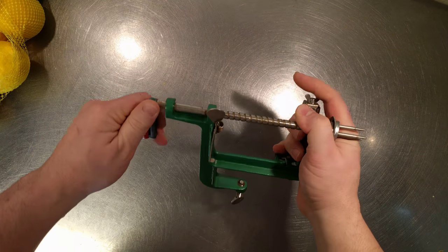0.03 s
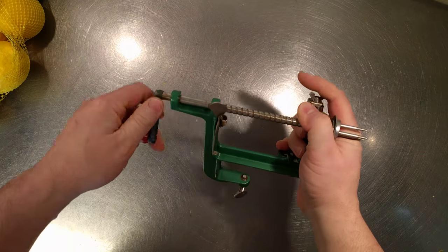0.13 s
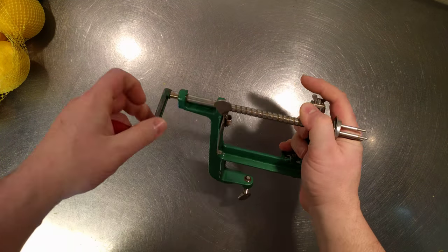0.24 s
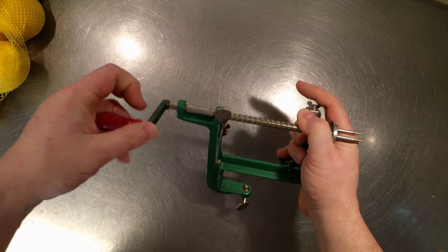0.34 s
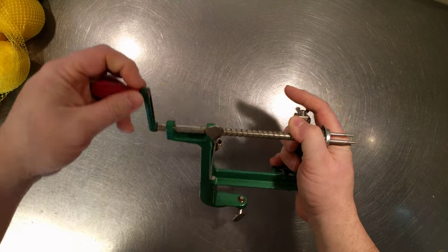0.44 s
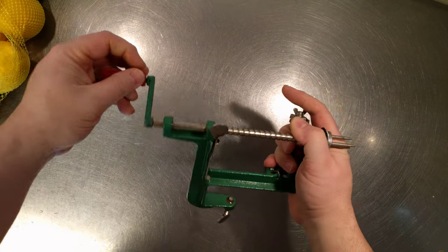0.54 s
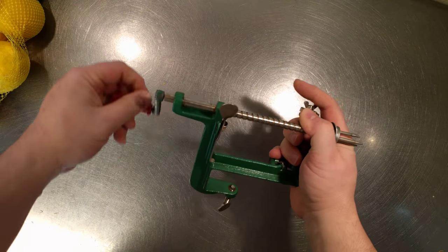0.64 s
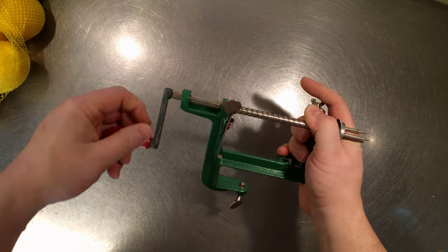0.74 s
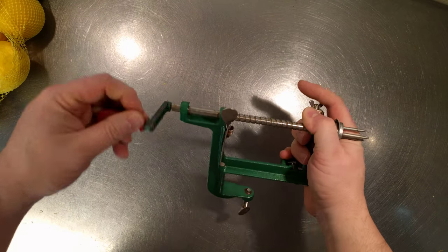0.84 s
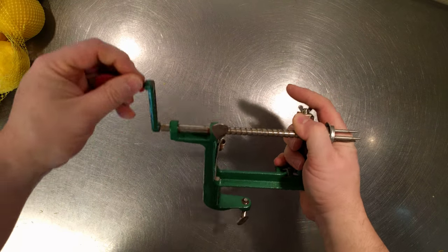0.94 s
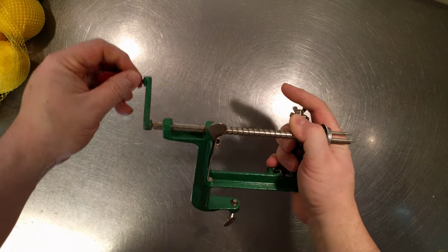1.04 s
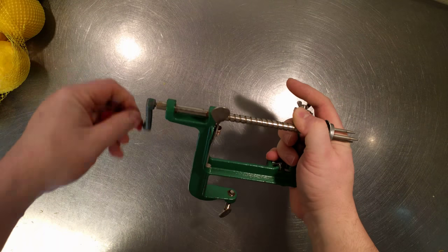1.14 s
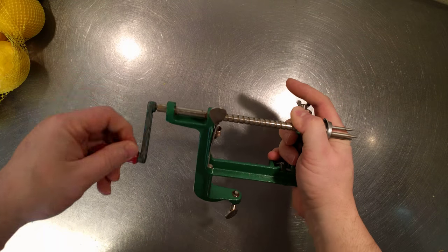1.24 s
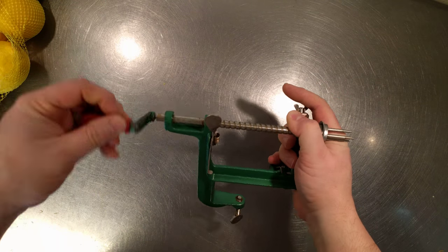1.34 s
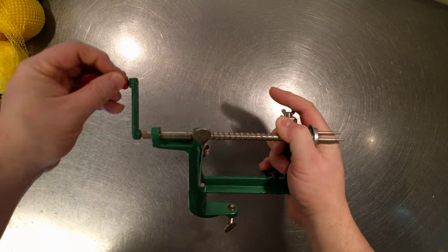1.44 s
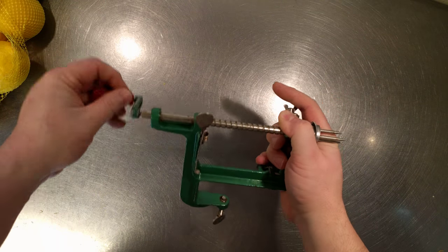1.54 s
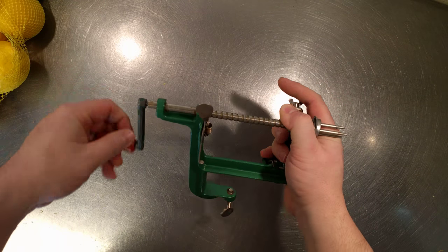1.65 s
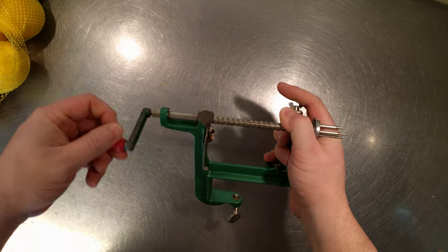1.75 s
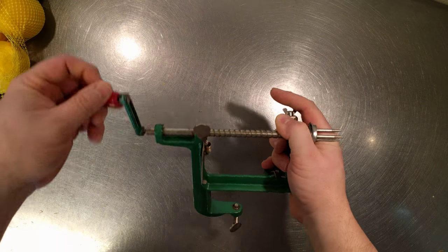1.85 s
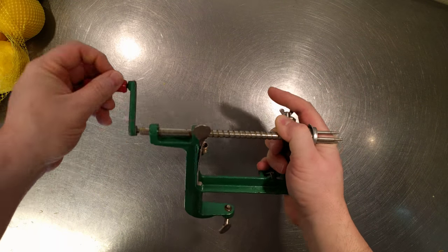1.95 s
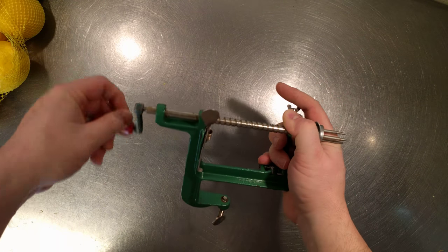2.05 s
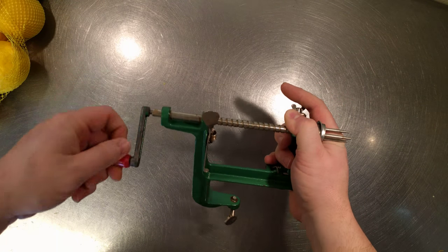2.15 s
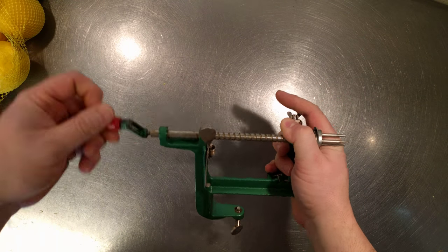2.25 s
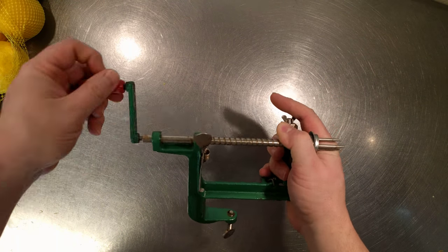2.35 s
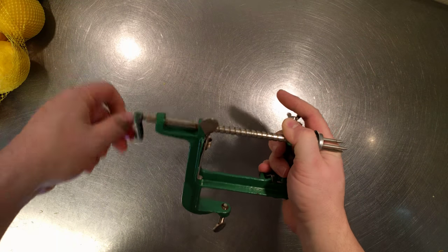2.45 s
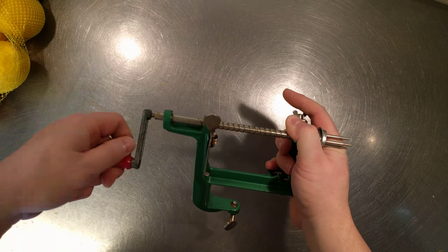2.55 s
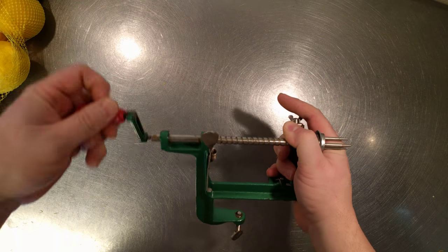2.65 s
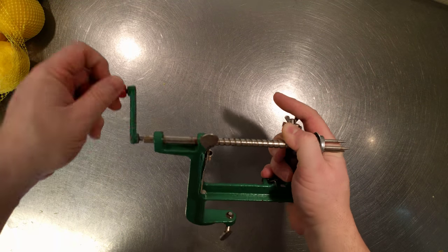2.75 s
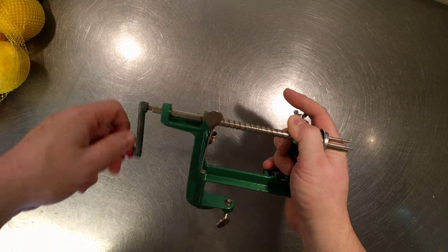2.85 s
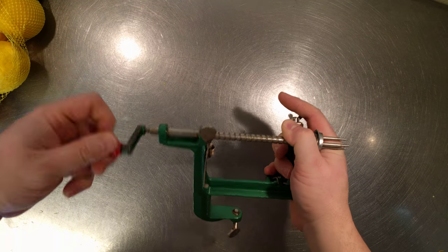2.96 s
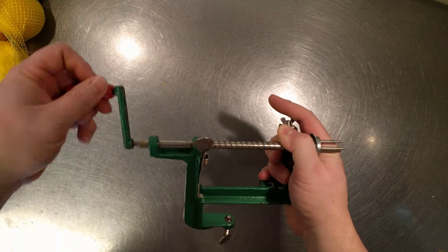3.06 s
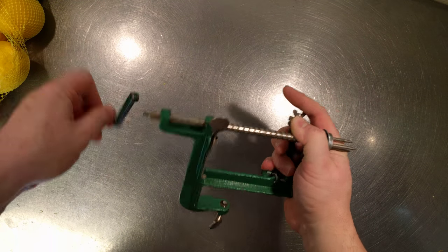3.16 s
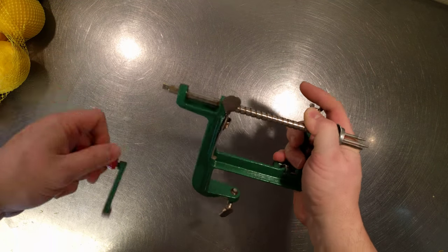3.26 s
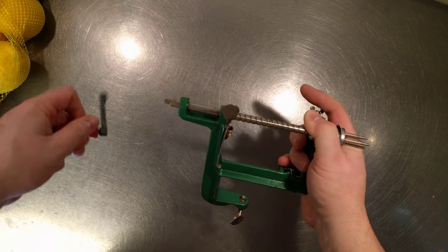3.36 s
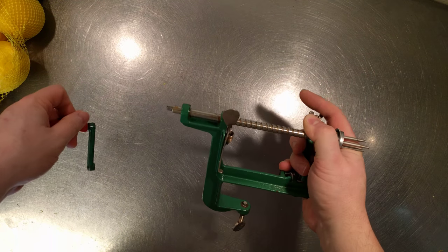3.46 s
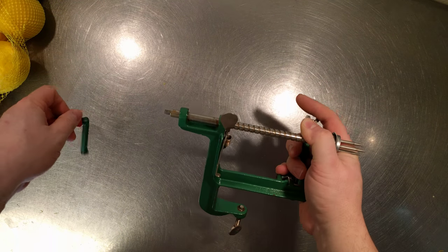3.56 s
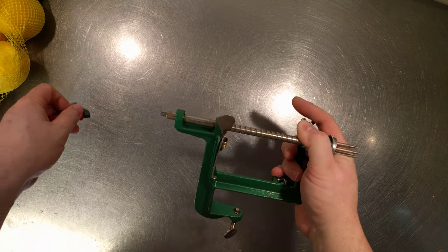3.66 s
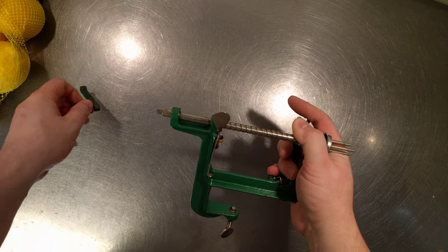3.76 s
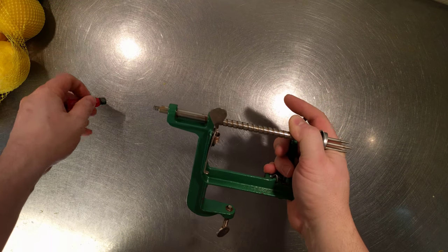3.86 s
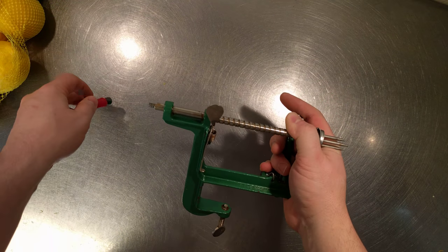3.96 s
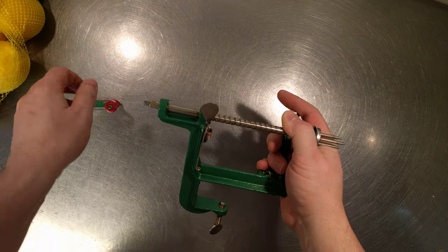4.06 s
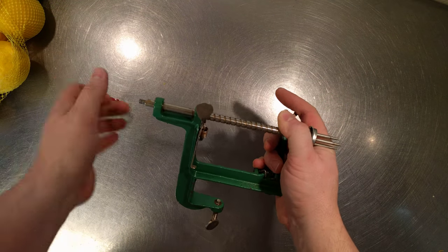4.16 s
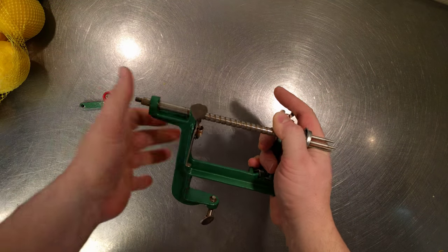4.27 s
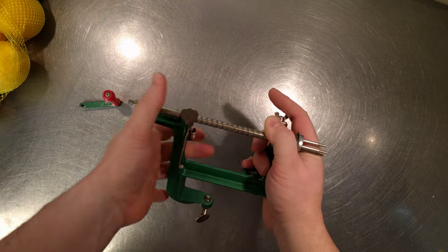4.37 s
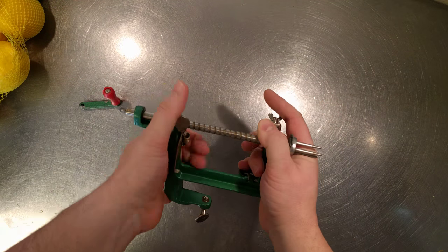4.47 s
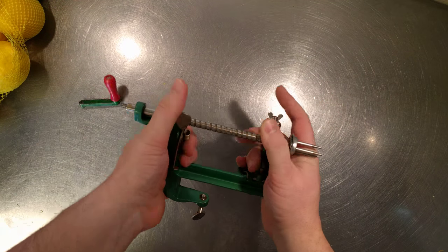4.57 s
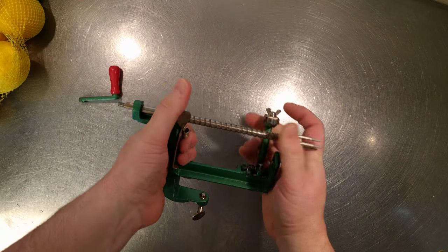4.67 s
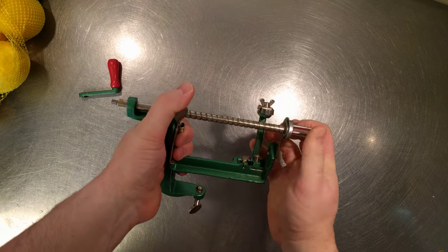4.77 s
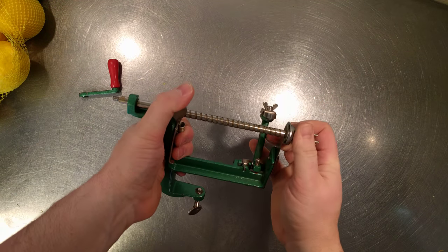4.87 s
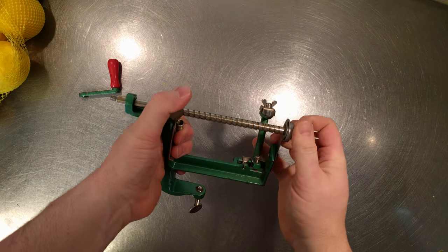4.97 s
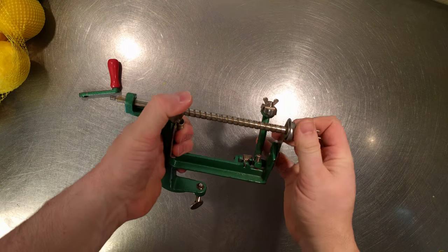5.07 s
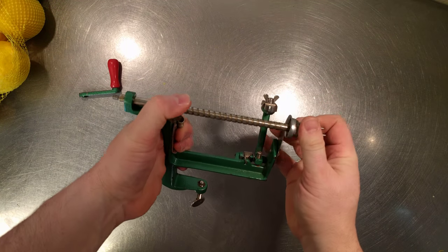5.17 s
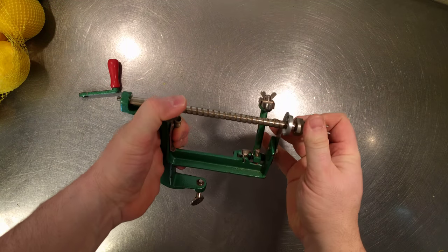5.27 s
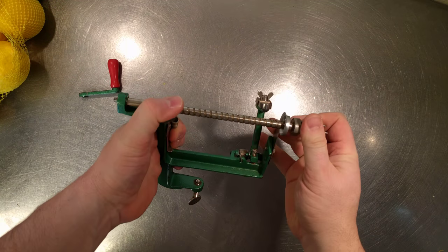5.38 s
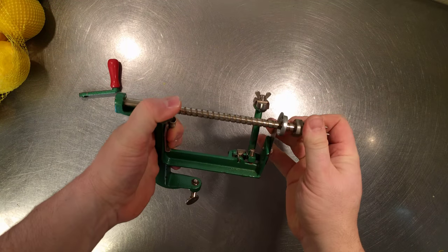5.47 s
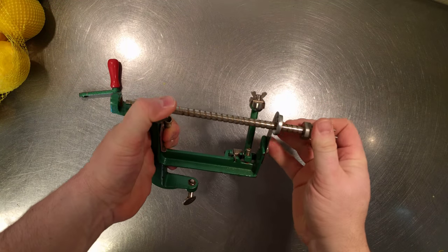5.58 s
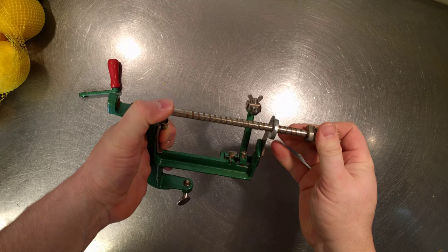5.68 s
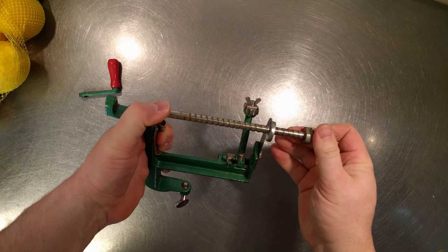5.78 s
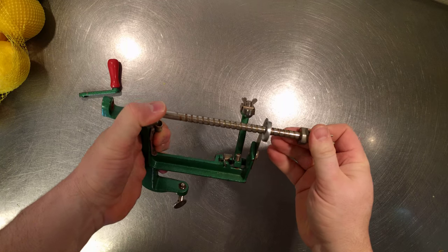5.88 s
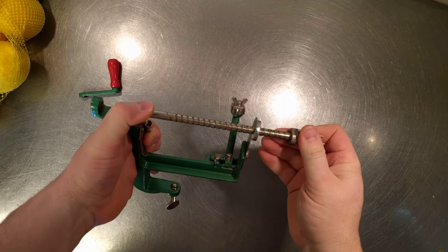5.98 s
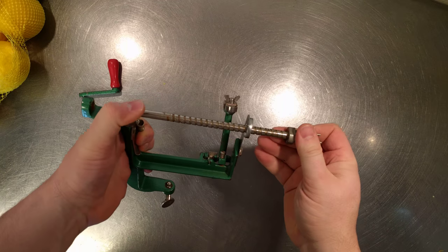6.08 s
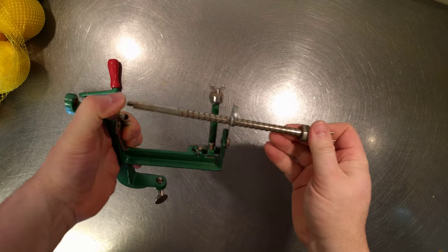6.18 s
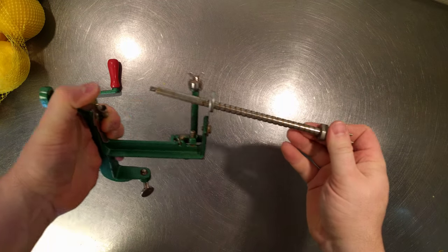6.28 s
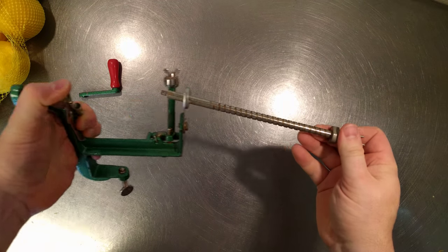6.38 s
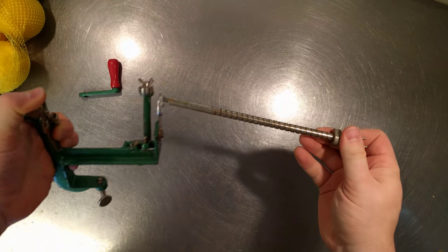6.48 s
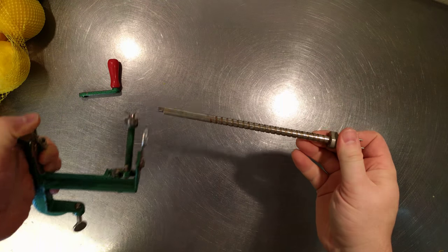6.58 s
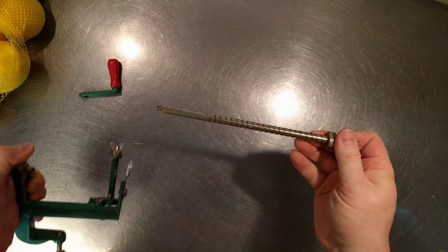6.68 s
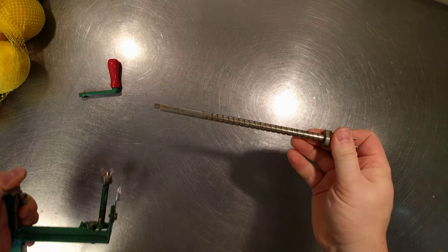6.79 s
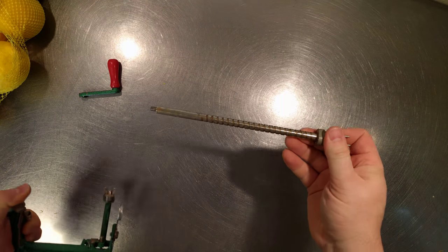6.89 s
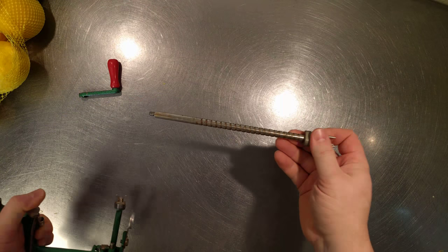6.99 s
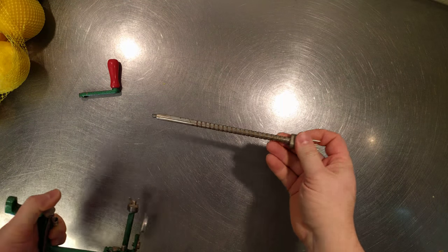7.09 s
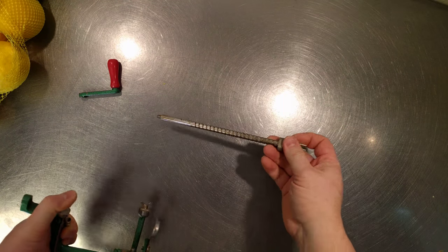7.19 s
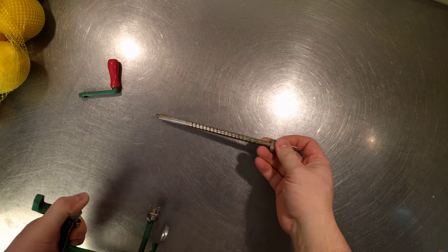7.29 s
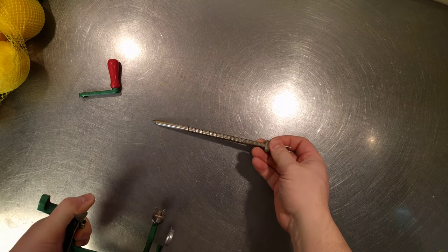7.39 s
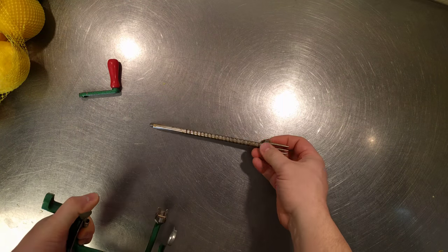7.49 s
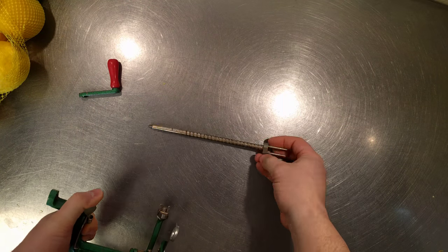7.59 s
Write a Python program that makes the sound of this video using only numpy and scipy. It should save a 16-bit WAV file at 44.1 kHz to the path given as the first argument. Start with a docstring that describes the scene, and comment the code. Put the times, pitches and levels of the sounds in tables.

```python
"""A fridge hums in a small hard kitchen, and a crank ticks in its thread as it is unscrewed:
a cast-iron apple peeler is being taken apart on a steel counter. The crank is dropped and the
sprung blade arm snaps back, each a clash that sets the iron and the steel top ringing.
The threaded shaft rubs, sings and clinks out through its guide and is put down on the counter."""
import sys
import numpy as np
from scipy import signal
from scipy.fft import rfft, irfft
from scipy.io import wavfile
from scipy.ndimage import uniform_filter1d

SR = 44100
rng = np.random.default_rng(int(sys.argv[2]) if len(sys.argv) > 2 else 0)


def put_to_file(sound):
    """Save the sound as 16-bit audio at rate SR, in the file named by the first command-line argument."""
    columns = np.atleast_2d(sound).T  # one column per channel
    safe = np.clip(columns, -1, 1)
    whole_steps = np.round(safe * 32767)
    wavfile.write(sys.argv[1], SR, whole_steps.astype(np.int16))


N = 337365


def from_db(db):
    """Decibels to gain."""
    return 10 ** (np.asarray(db) / 20)


def unit_rms(x):
    """Scale to unit power."""
    return x / np.sqrt(np.mean(x ** 2) + 1e-20)


def seconds(size):
    """Time axis for size samples."""
    return np.arange(size) / SR


def decay(t, t60):
    """Envelope that falls 60 dB in t60 seconds."""
    return np.exp(-np.log(1000) * t / t60)


def at_hz(points, hz):
    """Read a curve on a log-frequency axis."""
    known, values = np.transpose(points)
    return np.interp(np.log(np.maximum(hz, 1)), np.log(known), values)


def add(out, start_s, sound):
    """Mix a sound in at start_s."""
    start = round(start_s * SR)
    out[start:start + len(sound)] += sound[:N - start]


def tint(x, eq):
    """Apply an EQ curve, roll off below its lowest point and scale to unit power."""
    hz = np.fft.rfftfreq(len(x), 1 / SR)
    low_cut = np.minimum(hz / eq[0][0], 1) ** 6
    return unit_rms(irfft(rfft(x) * from_db(at_hz(eq, hz)) * low_cut, len(x)))


def decay_by_octave(x, t60s):
    """Let every octave die away at its own rate."""
    hz, spectrum, t = np.fft.rfftfreq(len(x), 1 / SR), rfft(x), seconds(len(x))
    centres = np.geomspace(125, 16000, 8)
    bands = [at_hz(list(zip(centres, solo)), hz) for solo in np.eye(len(centres))]
    return sum(irfft(spectrum * band, len(x)) * decay(t, at_hz(t60s, centre))
               for centre, band in zip(centres, bands))


def drift(rate_hz, size):
    """Random modulation that glides to a new value rate_hz times a second."""
    knots = rng.standard_normal(4096)
    return np.interp(seconds(size) * rate_hz, np.arange(len(knots)), knots)


def resonate(x, hz, width_hz):
    """One resonance with unity gain at its peak."""
    r = np.exp(-np.pi * width_hz / SR)
    feedback = [1, -2 * r * np.cos(2 * np.pi * hz / SR), r * r]
    return signal.lfilter(np.array([1, 0, -1]) * (1 - r * r) / 2, feedback, x)


def crowded_modes(t, count):
    """Dense metal ring: undamped modes scattered evenly in frequency, each at its own strength."""
    lines = np.zeros(len(t) // 2 + 1, complex)
    strengths = rng.standard_normal(count) + 1j * rng.standard_normal(count)
    lines[rng.integers(1, len(lines), count)] = strengths
    return unit_rms(irfft(lines, len(t)))


def hand_pressure(length_s, fade_share):
    """A stroke swells, holds and fades; the two ramps take fade_share of its length."""
    return signal.windows.tukey(int(length_s * SR), fade_share)


# Motor, mains and fan tones: pitch_hz, level_db
FRIDGE_TONES = [(44.1, -63), (49.1, -47), (58.0, -54.5), (89.7, -46), (120.0, -39), (122.3, -58),
                (269.1, -63), (290.3, -65.5), (359.8, -58.5), (658.0, -54.5), (807.5, -63)]
# EQ of the fan's rush: freq_hz, gain_db
FAN_EQ = [(46, -3), (70, -19.5), (120, -6.5), (168, -11.5), (219, -20.5), (344, -17.5), (526, -20),
          (640, -14), (724, -21), (1170, -20), (3650, -29.5), (7470, -36), (17000, -37)]


def fridge(fan_db=-44.5, waver_db=1.0, wander_rad=0.15):
    """The bed: slightly wavering motor and mains tones over the rush of a fan."""
    t = seconds(N)
    out = from_db(fan_db) * tint(rng.standard_normal(N), FAN_EQ)
    for hz, level_db in FRIDGE_TONES:
        phase = 2 * np.pi * (hz * t + rng.random()) + wander_rad * drift(2.3, N)
        out += np.sqrt(2) * from_db(level_db + waver_db * drift(8.1, N)) * np.sin(phase)
    return out


# Reverb time of the room: freq_hz, t60_s
KITCHEN_DECAY = [(200, 0.38), (4000, 0.38), (16000, 0.32)]


def kitchen(send, predelay_s=0.0078):
    """Diffuse reflections of a small hard room, wet only."""
    tail = decay_by_octave(rng.standard_normal(SR // 2), KITCHEN_DECAY)
    tail *= seconds(len(tail)) > predelay_s
    return signal.fftconvolve(send, tail / np.linalg.norm(tail))[:N]


# Short pulls of the shaft through its guide: start_s, length_s, rub_db, tone_db
SHAFT_PULLS = [(5.229, 0.077, -42, -51), (5.569, 0.15, -52, -43.5), (6.047, 0.032, -43.5, -42),
               (6.149, 0.07, -43, -42)]
PULL_FADE_SHARE = 0.43


def shaft_singing(pitch_hz=2306, jitter_hz=35, flutter_db=3.5):
    """Stick and slip lock on to the shaft's strongest resonance: an unsteady tone on each pull."""
    out = np.zeros(N)
    for start_s, length_s, _, tone_db in SHAFT_PULLS:
        swell = hand_pressure(length_s, PULL_FADE_SHARE)
        phase = 2 * np.pi * np.cumsum(pitch_hz + jitter_hz * drift(197, len(swell))) / SR
        gain = from_db(tone_db + flutter_db * drift(93, len(swell)))
        add(out, start_s, np.sqrt(2) * gain * swell * np.sin(phase))
    return out


# EQ for each rubbing surface and each struck part: freq_hz, gain_db
CONTACT_EQ = { "crank": [(70, -10.5), (250, -15), (400, -9), (800, -7.5), (1550, -6), (3500, -6.5),
              (5800, -8), (9200, -2), (13000, -5.5), (17000, -9.5)], "arm": [(70, -6.5), (400, -7),
              (1000, -7), (1900, -1), (2900, 2), (3550, -8.5), (4400, 3.5), (5200, 1.5), (5900, -5),
              (7200, 5), (8100, -4), (9200, 1.5), (10700, -3), (17000, -11.5)], "shaft": [(100, -12),
              (160, -16), (380, -18), (720, -24), (1300, -12.5), (1840, -20.5), (3000, -21), (4750, -19.5),
              (8770, -15.5), (12000, -15.5), (17000, -20)], "counter": [(120, -18), (350, 8.5), (1100, -8),
              (2000, 6), (3500, -3), (9000, -4.5), (12000, -10), (17000, -15)], "scuff": [(300, -1),
              (700, -4.5), (1300, 0.5), (2100, -2), (3200, -15), (7000, -18), (10000, -11.5), (16000, -17)],
              "thread": [(1200, 8), (2400, 3.5), (4200, 4), (9000, -2), (16000, -9)], "guide": [(1700, -14),
              (2280, 0.5), (3000, -9), (6500, -8.5), (9500, -13.5), (16000, -15.5)]}
# Rubbing strokes: start_s, length_s, level_db, fade_share, surface
RUB_STROKES = [(1.16, 0.12, -32.5, 0.74, "scuff"), (2.523, 0.091, -48.5, 0.2, "thread"),
               (2.643, .085, -45.5, 0, "thread"), (2.849, 0.27, -52, 0.15, "thread"),
               (3.967, .155, -30.5, 0.46, "counter"), (6.244, 0.27, -50, 0.6, "thread")]


def rubs(grain_db=5.0, grains_per_s=300, bright_hz=4000):
    """Sliding metal catches and slips many times a stroke, and the slips set faint modes ringing."""
    out, t = np.zeros(N), seconds(4096)
    lowpass = signal.butter(2, bright_hz, fs=SR, output="sos")
    pulls = [(start_s, length_s, rub_db, PULL_FADE_SHARE, "guide")
             for start_s, length_s, rub_db, _ in SHAFT_PULLS]
    for start_s, length_s, level_db, fade_share, surface in RUB_STROKES + pulls:
        slips = rng.standard_normal(16384)
        slips *= from_db(grain_db * drift(grains_per_s, len(slips)))
        metal = crowded_modes(t, count=150) * decay(t, t60=0.07)
        ringing = signal.fftconvolve(slips, metal / np.linalg.norm(metal))[:len(slips)]
        pressure = hand_pressure(length_s, fade_share)
        scrape = tint(slips + ringing, CONTACT_EQ[surface])[:len(pressure)]
        dull = signal.sosfiltfilt(lowpass, scrape)
        # light pressure sounds dull: the highs follow pressure squared
        add(out, start_s, from_db(level_db) * (pressure * dull + pressure ** 2 * (scrape - dull)))
    return out


def held_knocks(knocks, body, chatter_t60, snap, full_db, narrowing):
    """A snap and a brief chatter ring hand-damped metal; soft knocks favour the struck pitch."""
    out, t = np.zeros(N), seconds(4096)
    low_cut = signal.butter(2, 1300, "high", fs=SR, output="sos")  # small parts radiate little bass
    for start_s, level_db, struck_hz in knocks:
        # from full_db up, a knock wakes every resonance
        fall_db_per_octave = narrowing * max(full_db - level_db, 0)
        contact = rng.standard_normal(len(t)) * decay(t, chatter_t60)
        contact[0] += snap
        ring = np.zeros(len(t))
        for k, (hz, width_hz, gain_db) in enumerate(body):
            octaves = np.log2(hz / struck_hz)
            fall_db = fall_db_per_octave * max(octaves, -0.5 * octaves)  # half as steep below
            spread_db = 2.0 * rng.standard_normal()
            ring += (-1) ** k * from_db(gain_db - fall_db + spread_db) * resonate(contact, hz, width_hz)
        ring = signal.sosfilt(low_cut, ring)
        peak_rms = np.sqrt(uniform_filter1d(ring ** 2, size=128).max())
        add(out, start_s, from_db(level_db) * ring / peak_rms)
    return out


# Ticks of the crank: start_s, level_db, struck_hz
CRANK_HITS = [(.4459, -16.5, 7500), (.7938, -34, 2230), (1.2497, -27, 4100), (1.4539, -25, 8400),
              (1.6921, -29.5, 5300), (1.734, -31.5, 2070), (2.0093, -37.5, 3100), (2.2376, -34, 2940),
              (2.261, -30, 3350), (2.3351, -26, 2300), (2.9216, -25.5, 2170), (3.1314, -33, 1550),
              (3.2058, -36.5, 2830)]
# Resonances of the hand-held crank: pitch_hz, width_hz, gain_db
CRANK_RESONANCES = [(1570, 110, -0.5), (2080, 680, -1), (2760, 760, 3), (3930, 320, 5.5), (4830, 340, 5.5),
                    (5900, 800, 2.5), (8760, 1900, 2), (14800, 1400, 0.5)]


def crank_ticks():
    """Play in the thread lets the crank tick as it is unscrewed."""
    return held_knocks(CRANK_HITS, CRANK_RESONANCES,
                       chatter_t60=0.05, snap=8.5, full_db=-10.5, narrowing=0.73)


# Clinks of the shaft: start_s, level_db, struck_hz
SHAFT_HITS = [(5.057, -34, 6400), (5.272, -35, 2340), (5.642, -34, 2260), (5.677, -35, 2300),
              (6.2297, -22.5, 14100), (6.3395, -27, 7040), (6.3523, -25.5, 8800), (6.3726, -23.5, 8100),
              (6.4211, -24.5, 8000), (6.5318, -19.5, 2400), (6.5434, -27.5, 12000)]
# Resonances of the hand-held shaft: pitch_hz, width_hz, gain_db
SHAFT_RESONANCES = [(1760, 98, -0.5), (2268, 63, 17), (3390, 150, 1), (4400, 1130, -2), (6600, 220, -5),
                    (7150, 110, -0.5), (7980, 130, 0.5), (8820, 110, 5), (11100, 770, -5), (13600, 510, -3),
                    (15600, 500, -6)]


def shaft_clinks():
    """The shaft knocks against its guide on the way out."""
    return held_knocks(SHAFT_HITS, SHAFT_RESONANCES,
                       chatter_t60=0.036, snap=4.0, full_db=-14.5, narrowing=0.49)


# Ring-out of the steel top: freq_hz, t60_s
COUNTER_DECAY = [(100, 0.57), (400, 0.49), (1000, 0.4), (3000, 0.52), (8000, 0.34), (16000, 0.04)]
# Free ringing of each part: pitch_hz, gain_db, t60_s
PART_MODES = { "crank": [(790, -25.5, 0.32), (1530, -14, 0.13), (2070, -39, 0.26), (3140, -39, 0.34),
              (4320, -34, 0.35), (5150, -14, 0.084), (8700, -33, .4), (10900, -34, 0.28)],
              "arm": [(2065, -28, 0.3), (2080, -23, 0.15), (2490, -26, 0.23), (3000, -35, 0.31),
              (4080, -40, 0.57), (4361, -32, 0.37), (4900, -32, 0.55), (5080, -35, 0.5), (5370, -32, 0.23),
              (2730, -33, 0.17), (7450, -47, 0.21), (7267, -41, 0.36), (8150, -30, 0.29),
              (10270, -37, 0.083)], "shaft": [(108.3, -27, 0.46), (175.5, -36, 0.71), (305, -25, 0.21),
              (399.6, -28.5, 0.41), (1176, -22.5, 0.27), (2420, -16.5, 0.14), (4420, -39, 0.57),
              (5820, -9, 0.058), (7623, -36, 0.24), (9000, -13, 0.12), (10480, -34, .25),
              (15610, -26, .15)]}
# Crank dropped, arm snapping back, shaft put down: start_s, level_db, clash_t60_s, counter_gain_db, part
HEAVY_HITS = [(3.9676, -23.5, 0.021, -2, "crank"), (4.107, 5, 0.071, -20.5, "crank"),
              (4.119, -7.5, 0.053, -9.5, "crank"), (4.2066, -12.5, 0.1, -12, "crank"),
              (4.693, -16.5, 0.16, -1, "arm"), (4.7014, 1, 0.084, -19, "arm"),
              (7.4307, -1, 0.063, -12, "shaft")]


def blows(boom_db=9.0, ring_trim_db=-1.0):
    """Iron clashes on steel; the counter's crowded modes and the part's own few modes ring on."""
    out, t = np.zeros(N), seconds(32768)
    for start_s, level_db, clash_t60, counter_gain_db, part in HEAVY_HITS:
        burst, wash = rng.standard_normal((2, len(t)))
        clash = tint(burst, CONTACT_EQ[part]) * decay(t, clash_t60)
        # the wide sheet radiates the lows better than the small contact does
        sheet_eq = [(hz, db + at_hz([(300, boom_db), (6000, 0)], hz)) for hz, db in CONTACT_EQ[part]]
        sheet = tint(crowded_modes(t, count=1500) + 0.5 * wash, sheet_eq)
        counter = from_db(counter_gain_db) * decay_by_octave(sheet, COUNTER_DECAY)
        ring = sum(from_db(db) * np.sin(2 * np.pi * hz * t) * decay(t, t60)
                   for hz, db, t60 in PART_MODES[part])
        add(out, start_s, from_db(level_db) * (clash + counter + from_db(ring_trim_db) * ring))
    return out


def scene(handling_send_db=-13.0, blow_send_db=-14.0):
    """Mono mix: handling and heavy blows, each with a send to the room, over the fridge."""
    handling = crank_ticks() + shaft_clinks() + rubs() + shaft_singing()
    heavy = blows()
    room = kitchen(from_db(handling_send_db) * handling + from_db(blow_send_db) * heavy)
    return (handling + heavy + room + fridge())[None]


def record(dry, ceiling=0.78, cutoff_hz=17050):
    """The loudest blows overload and clip; a steep low-pass takes off the very top."""
    lowpass = signal.ellip(10, 0.1, 70, cutoff_hz, fs=SR, output="sos")
    return signal.sosfilt(lowpass, np.clip(dry, -ceiling, ceiling))


dry = scene()
out = record(dry)
put_to_file(out)
```